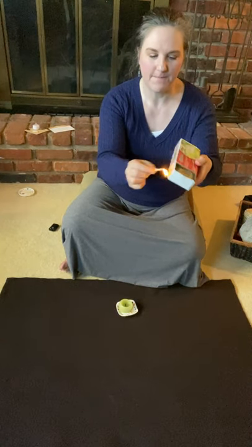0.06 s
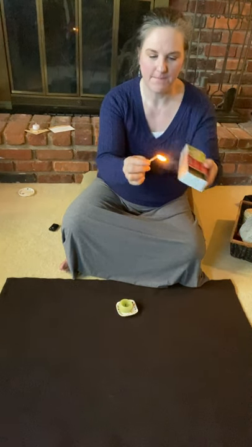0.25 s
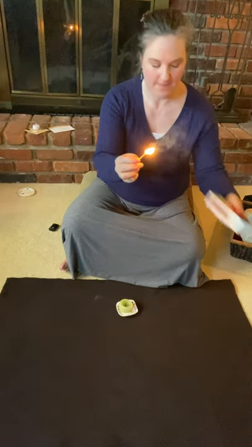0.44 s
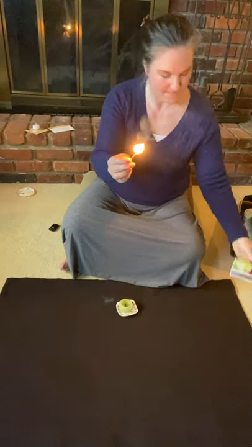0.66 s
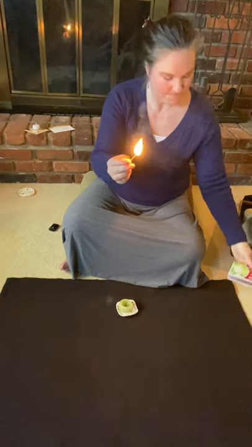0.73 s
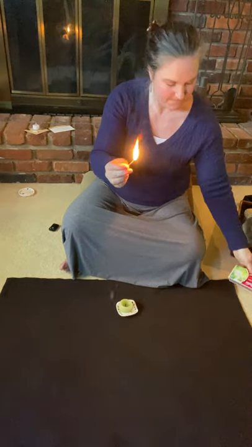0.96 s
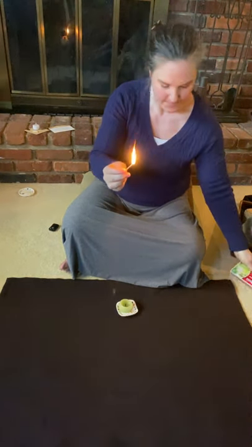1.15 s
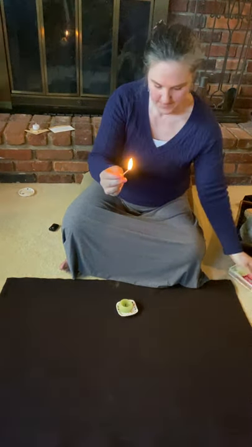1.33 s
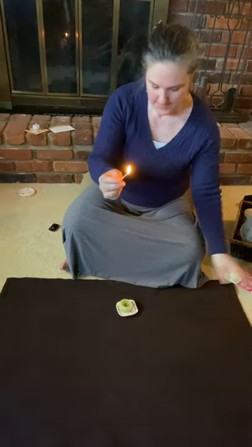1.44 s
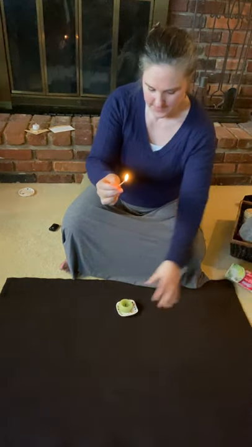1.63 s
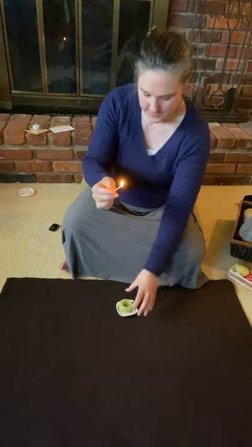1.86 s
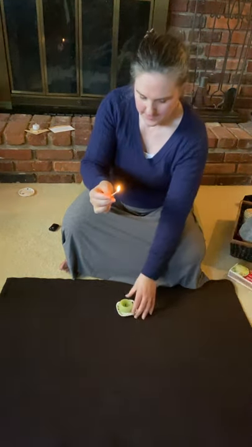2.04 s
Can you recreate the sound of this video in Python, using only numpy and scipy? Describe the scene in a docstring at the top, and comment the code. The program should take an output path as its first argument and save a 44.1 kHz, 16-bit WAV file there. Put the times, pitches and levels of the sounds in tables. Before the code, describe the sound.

Close stereo pickup in a small, quiet indoor room: a brief gritty match strike and soft puff, sparse wooden knocks inside the cardboard box, then a denser rattle with dull, soft thuds as it lands on carpet.

```python
"""In a quiet, low-rumbling room, two close microphone ports hear a match struck on its cardboard box.
First, noise grains shaped like the box wall scrape, bright ones flare, a dull puff starts; then a faint hiss.
As the box is carried off, matches knock (struck box modes) and slide (clouds of small strikes) inside it.
A brief squeak of the sleeve (narrow noise bands) follows; then the box is set down on carpet with two
damped low thuds, and is let go among the last knocks and slides."""
import sys
import numpy as np
from scipy import signal
from scipy.fft import rfft, irfft, next_fast_len
from scipy.io import wavfile
from scipy.ndimage import uniform_filter1d

SR = 44100
rng = np.random.default_rng(int(sys.argv[2]) if len(sys.argv) > 2 else 0)


def dump_mix(stems):
    """Bounce the given channels to the path in sys.argv[1] as a 16-bit WAV at rate SR."""
    frames = np.atleast_2d(stems).T  # one column per channel
    limited = np.clip(frames, -1, 1)  # hard clip at full scale
    pcm = np.round(limited * 32767).astype(np.int16)
    wavfile.write(sys.argv[1], SR, pcm)


def volts_from_decibels(level):
    """Turn decibel levels (scalar or array-like) into linear amplitude factors."""
    exponent = np.asarray(level, float) / 20
    return 10 ** exponent


N = 92345
T = np.arange(N) / SR
M = next_fast_len(N + SR // 2)  # transform length, with room for tails
LOG_HZ = np.log(np.maximum(np.arange(M // 2 + 1) * SR / M, 1.))

# Low rumble of the room: (frequency [Hz], relative density [dB per Hz])
RUMBLE_COLOUR = [(25, -58), (55, -6.5), (75, -2), (110, -19), (500, -35), (4500, -50), (13000, -55)]
# Phase between the two close microphone ports: (frequency [Hz], phase [rad])
PORT_PHASE = [(60, 0), (1400, 0.33), (2300, 1), (6500, 0.48), (8500, -1.22), (11000, -1.5), (13500, -3)]
# Box meeting the carpet: (time [s], level before swell and decay [dB], frequency [Hz])
THUDS = [(1.44, -49, 173), (1.81, -60, 188)]
# Ringing modes of the box: (frequency [Hz], relative level [dB])
BOX_MODES = [(560, -16.5), (760, -7.5), (900, -4.5), (1050, -4), (1180, -2.5), (1400, -2), (1700, -2.5),
             (1950, 1), (2450, -3.5)]
# Matches sliding and tumbling as the box moves: (time [s], ring level [dB], treble level [dB])
SLIDE_LEVELS = [(.44, -72, -79.5), (.49, -59, -67), (.54, -71, -82.5), (.68, -61.5, -68.5), (.8, -82, -75),
                (.94, -75, -70.5), (1.145, -78, -74.5), (1.185, -56.5, -64.5), (1.25, -104, -100),
                (1.43, -100, -87), (1.445, -55.5, -63.5), (1.49, -68.5, -66.5), (1.505, -47.5, -58.5),
                (1.535, -47, -52.5), (1.565, -57, -64), (1.63, -49.5, -55.5), (1.79, -76.5, -86),
                (1.812, -49.5, -48), (1.86, -58, -59), (1.885, -47.5, -47), (1.94, -62.5, -67),
                (2.04, -100.5, -86)]
# Papery treble of slides and ticks: (frequency [Hz], relative density [dB per Hz])
RATTLE_COLOUR = [(1800, -9), (3000, -4), (5100, -4), (7600, -11), (9300, -5), (11000, -18.5),
                 (13500, -22.5)]
# Single matches knocking the wall:
# (time [s], ring peak [dB], favoured pitch [Hz], tick against the ring [dB])
KNOCKS = [(.347, -52, 1900, -14.5), (.492, -47, 1070, -20), (.557, -50.5, 1860, -3.5),
          (.567, -47, 1150, -16), (.628, -40.5, 1340, -6), (.925, -50.5, 1290, -25),
          (.937, -42.5, 1520, -7), (1.112, -53, 2090, -5), (1.19, -48.5, 1470, -22),
          (1.502, -31.5, 1200, -23), (1.519, -30, 1370, -36), (1.527, -28.5, 1310, -33),
          (1.535, -30.5, 1410, -28), (1.576, -34, 1175, -17), (1.61, -34, 1220, -29),
          (1.625, -39, 1930, 1.5), (1.688, -44, 1440, -5.5), (1.82, -35, 1100, 0), (1.84, -38, 1660, -6.5),
          (1.852, -36.5, 1400, -25), (1.88, -38, 1800, -2), (1.9, -38, 1340, -24),
          (1.954, -42.5, 1290, -23)]
# Brief thin squeak of the box sleeve: (time [s], frequency [Hz], starting level [dB])
SQUEAKS = [(1.071, 9750, -58), (1.074, 3613, -69)]
# Soft hiss of flame and sleeve: (time [s], level before flicker [dB])
HISS_LEVEL = [(.25, -67), (.39, -75.5), (.46, -69), (1.02, -65), (1.04, -74), (1.2, -72.5), (1.37, -81)]
# Tone of that hiss: (frequency [Hz], relative density [dB per Hz])
HISS_COLOUR = [(200, -1), (2400, -3), (3000, -9), (6400, -6.5), (10000, -14)]
# Scrape of the head and its flare, levels before flicker:
# (time [s], box body level [dB], grit and gas treble level [dB])
STRIKE_LEVELS = [(.078, -66, -100), (.092, -54.5, -81), (.111, -40.5, -62), (.116, -42.5, -34),
                 (.135, -37, -38), (.152, -37.5, -43), (.165, -47, -49), (.22, -60, -58.5),
                 (.33, -74, -87.5)]
# Box wall under the scrape: (frequency [Hz], relative density [dB per Hz])
STRIP_COLOUR = [(550, -26.5), (850, -4.5), (1050, -9.5), (1350, -5), (2700, -10), (2950, -7), (3600, -30.5)]
# Puff and fizz of the flare: (frequency [Hz], relative density [dB per Hz])
GRIT_COLOUR = [(250, -10), (2000, -17), (3600, -3), (6800, -0.5), (9500, -5.5), (13500, -10)]

RUMBLE_DB = -66
ROOM_DB, WIDTH_DB = -8.5, -11  # room tail in the centre and, before its band-pass, in the width
ROOM_T60_S, ROOM_TREBLE_T60_S = 0.2, 0.19
PLACES = 12  # steps between the successive places of the hands
THUD_T60_S = 0.047
BOX_T60_S, BOX_DAMP = 0.011, 0.18  # ring time at 1 kHz; how fast it shortens with pitch
CONTACT_S, TICK_S = 0.001208, 0.0018  # swell of a soft contact; decay of a dry tick
FOCUS = 0.23  # spread of favoured modes: octaves in a knock, share of the mode list in a slide
SLIDE_PER_S, SLIDE_SPREAD_DB = 2400, 1.5
GRIT_PER_S, GRIT_SPREAD_DB = 12000, 0.5
PUFF_S, PUFF_DB, PUFF_HZ, PUFF_T60_S = .113, -51.5, 380, 0.59


def over_hz(table):
    """A table of (frequency [Hz], value) read at every bin, along log frequency."""
    hz, value = np.array(table).T
    return np.interp(LOG_HZ, np.log(hz), value)


def colour(x, table):
    """Shape x by (frequency [Hz], gain [dB]) points; rms 1."""
    y = irfft(rfft(x, M) * volts_from_decibels(over_hz(table)), M)[:N]
    return y / np.sqrt(np.mean(y ** 2))


def curve(rows, index):
    """Gain along one level column, inaudible outside the rows."""
    r = np.array(rows, float)
    return volts_from_decibels(np.interp(T, r[:, 0], r[:, index], left=-150, right=-150))


def decay(t, t60):
    """Exponential fall by 60 dB in t60 seconds."""
    return np.exp(-np.log(1000) * t / t60)


def add(out, s, x):
    """Mix x into out at s seconds."""
    i = int(s * SR)
    out[i:i + len(x)] += x[:N - i]


def grains(per_s, spread_db):
    """Random clicks of either sign and unequal size, none huge."""
    hit = rng.random(N) < per_s / SR
    sign = np.sign(rng.standard_normal(N))
    size_db = spread_db * np.minimum(rng.exponential(size=N), 3)
    return hit * sign * volts_from_decibels(size_db)


def flicker(per_s, depth_db):
    """The level jumps about in short random steps with softened edges."""
    k = int(SR / per_s)
    steps = np.repeat(rng.standard_normal(N // k + 1), k)
    return volts_from_decibels(depth_db * uniform_filter1d(steps, k // 2)[:N])


def ring(weights, phases):
    """The box modes struck once; a soft contact lets them swell in."""
    hz, db = np.array(BOX_MODES).T
    t60 = BOX_T60_S * (1e3 / hz) ** BOX_DAMP
    t = T[:SR // 10, None]
    swell = (1 - np.exp(-t / CONTACT_S)) ** 2
    tones = np.sin(2 * np.pi * (hz * t + phases))  # phases in turns
    return (weights * volts_from_decibels(db) * swell * tones * decay(t, t60)).sum(axis=1)


def rumble():
    """Low room noise for centre and width, two draws that waver together in level."""
    noise = np.array([colour(rng.standard_normal(N), RUMBLE_COLOUR) for _ in range(2)])
    return volts_from_decibels(RUMBLE_DB) * flicker(5.19, 3.0) * noise


def room(x):
    """Short noisy tails for centre and width; the hands move, so each place has its own pair."""
    t, out = T[:SR // 2], 0
    for place in range(PLACES + 1):
        # crossfade from one place to the next
        here = np.sqrt(np.maximum(1 - np.abs(np.arange(N) * PLACES / N - place), 0))
        noise = rng.standard_normal((2, len(t)))
        low = uniform_filter1d(noise, size=9, axis=1)
        treble = 0.61 * (noise - low)  # fades sooner than the low part
        tail = low * decay(t, ROOM_T60_S) + treble * decay(t, ROOM_TREBLE_T60_S)
        tail /= np.sqrt((tail ** 2).sum(axis=1, keepdims=True))
        out = out + signal.fftconvolve((x * here)[None], tail, axes=1)[:, :N]
    return volts_from_decibels(ROOM_DB) * out


def thuds():
    """A dull, damped push as the box lands: a low sine swells in and dies away."""
    out, t = np.zeros(N), T[:SR // 4]
    for s, db, hz in THUDS:
        swell = 1 - np.exp(-t / 0.0013)
        add(out, s, volts_from_decibels(db) * np.sin(2 * np.pi * hz * t) * decay(t, THUD_T60_S) * swell)
    return out


def slide():
    """Many small unseen knocks, each stream favouring other modes, and a papery treble that catches and slips."""
    body, jolts = 0, flicker(70, 4.24)
    mode_place = np.linspace(0, 1, len(BOX_MODES))
    for centre in mode_place:
        near = np.exp(-.5 * ((mode_place - centre) / FOCUS) ** 2)
        clicks = grains(SLIDE_PER_S / len(BOX_MODES), SLIDE_SPREAD_DB) * jolts
        struck = ring(near, rng.random(len(BOX_MODES)))
        body = body + signal.fftconvolve(clicks, struck)[:N]
    body = body / np.sqrt(np.mean(body ** 2))
    treble = colour(grains(3500, 4.1) * flicker(200, 3.44), RATTLE_COLOUR)
    return curve(SLIDE_LEVELS, index=1) * body + curve(SLIDE_LEVELS, index=2) * treble


def knocks():
    """Each match rings the modes near its favoured pitch and adds a dry tick of noise."""
    rings, ticks = np.zeros(N), np.zeros(N)
    t = T[:SR // 50]
    mode_hz = np.array(BOX_MODES)[:, 0]
    for s, db, hz, tick_db in KNOCKS:
        near = np.exp(-.5 * (np.log2(mode_hz / hz) / FOCUS) ** 2)
        x = ring(near + 0.18, 0.19 * rng.standard_normal(len(mode_hz)))
        add(rings, s - CONTACT_S, volts_from_decibels(db) * x / np.abs(x).max())
        add(ticks, s, volts_from_decibels(db + tick_db) * rng.standard_normal(len(t)) * np.exp(-t / TICK_S))
    shape = volts_from_decibels(over_hz(RATTLE_COLOUR))
    shape = shape / np.sqrt(np.mean(shape ** 2))
    return rings + irfft(rfft(ticks, M) * shape, M)[:N]


def squeak():
    """Narrow bands of friction noise: tones with randomly wandering level and phase, dying away."""
    out, t = np.zeros(N), T[:SR // 10]
    for s, hz, db in SQUEAKS:
        k = int(SR * 14. / hz)  # the wander is smoothed over 14 cycles
        wobble = uniform_filter1d(rng.standard_normal((2, len(t))), size=k, axis=1) * np.sqrt(k)
        turn = 2 * np.pi * hz * t
        band = wobble[0] * np.cos(turn) + wobble[1] * np.sin(turn)
        add(out, s, volts_from_decibels(db) * np.exp(-t * hz / 120) * band)
    return out


def puff():
    """Low rush of gas as the head catches: a dull noise band that starts at ignition and dies away."""
    sos = signal.butter(2, [PUFF_HZ / 2, PUFF_HZ * 2], "band", fs=SR, output="sos")
    band = signal.sosfilt(sos, rng.standard_normal(N))
    t = np.maximum(T - PUFF_S, 0)
    return volts_from_decibels(PUFF_DB) * band / band.std() * (t > 0) * decay(t, PUFF_T60_S)


def strike():
    """Grit of the strip shakes the box wall; the head flares bright, sputters and then hisses on."""
    body = curve(STRIKE_LEVELS, index=1) * colour(grains(GRIT_PER_S, GRIT_SPREAD_DB), STRIP_COLOUR)
    flare = curve(STRIKE_LEVELS, index=2) * colour(grains(GRIT_PER_S, GRIT_SPREAD_DB), GRIT_COLOUR)
    hiss = curve(HISS_LEVEL, index=1) * colour(grains(GRIT_PER_S, GRIT_SPREAD_DB), HISS_COLOUR)
    return (body + flare + hiss) * flicker(150, 0.68)


def scene():
    """Two close ports hear all sound with a phase that parts with pitch; room and rumble add mid-band width."""
    near = strike() + puff() + squeak() + knocks() + slide() + thuds()
    centre, wide = room(near) + rumble()
    tilt = np.exp(.5j * over_hz(PORT_PHASE))  # half the phase to each port
    ports = irfft(rfft(near + centre, M) * np.array([tilt, 1 / tilt]), M)[:, :N]
    wide = signal.sosfilt(signal.butter(2, [260, 4500], "band", fs=SR, output="sos"), wide)
    return ports + volts_from_decibels(WIDTH_DB - ROOM_DB) * wide * np.array([[1], [-1]])  # opposite sign in each port


def roll_off(x):
    """The treble ends steeply here."""
    return signal.sosfilt(signal.butter(12, 15800, fs=SR, output="sos"), x)


def record(dry):
    """Pass on the finished mix of the two ports."""
    return roll_off(dry)


dry = scene()
out = record(dry)
dump_mix(out)
```